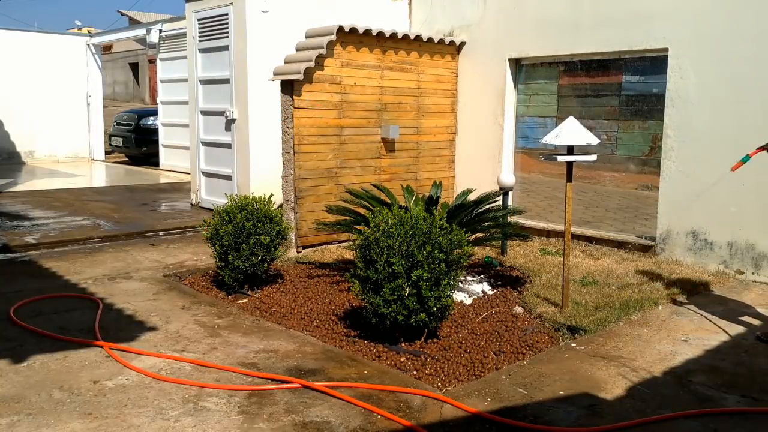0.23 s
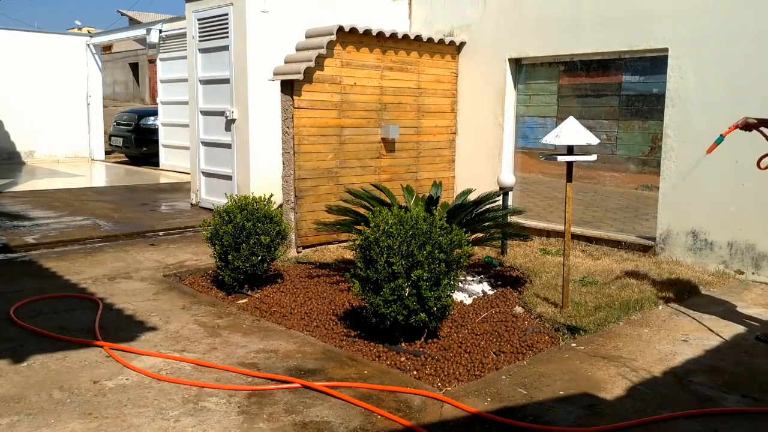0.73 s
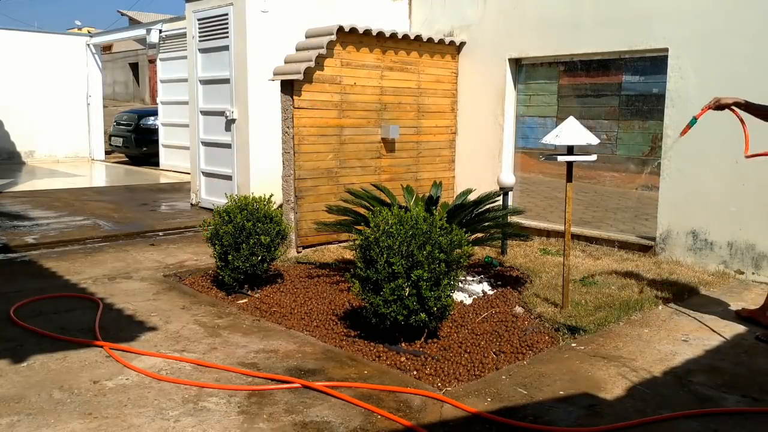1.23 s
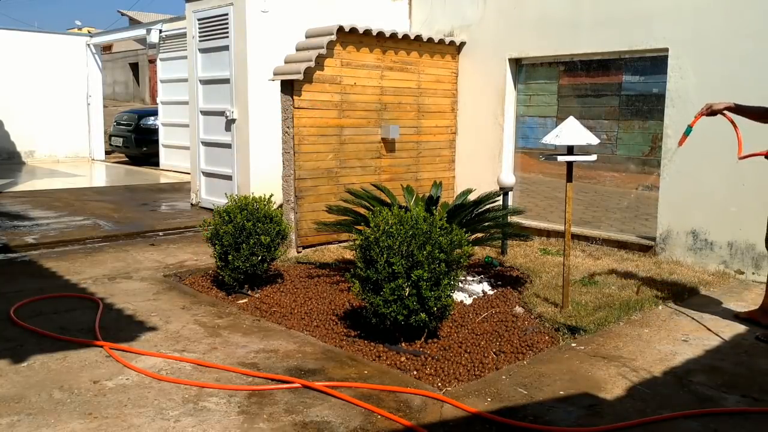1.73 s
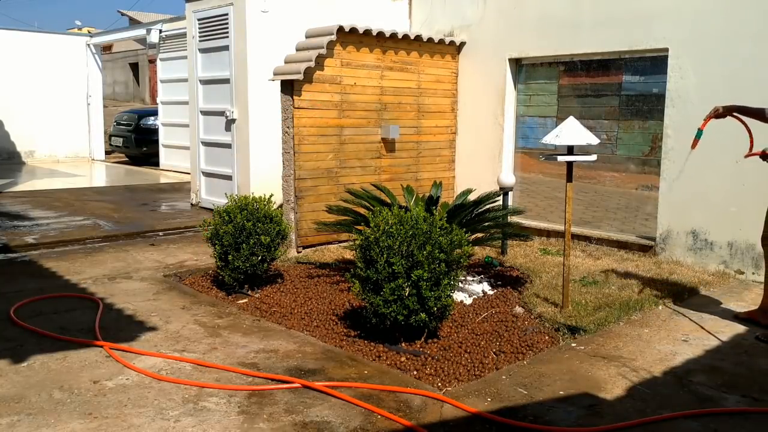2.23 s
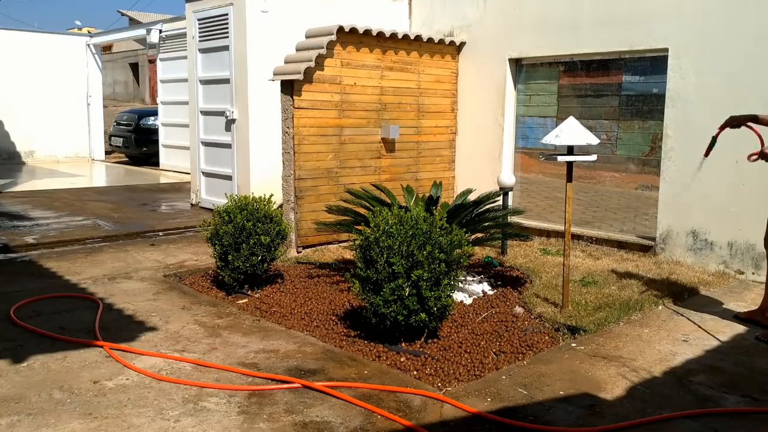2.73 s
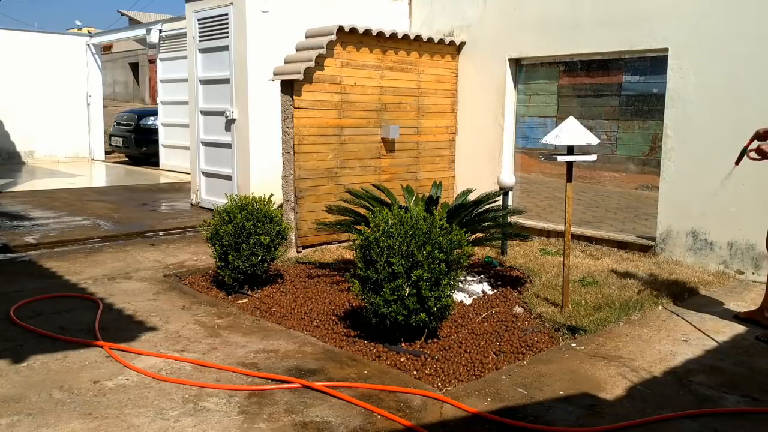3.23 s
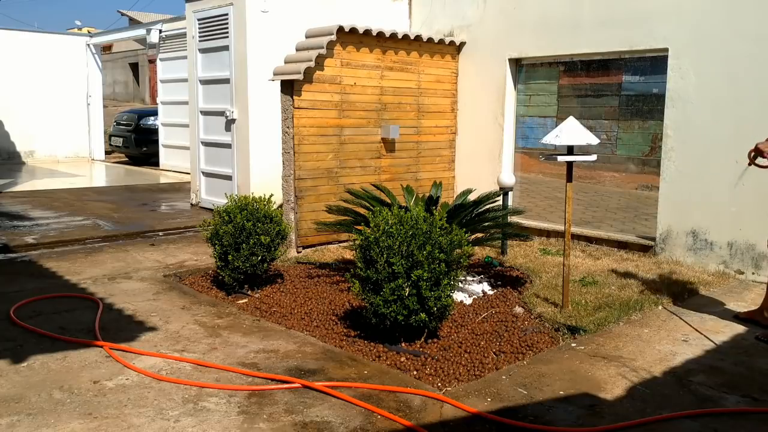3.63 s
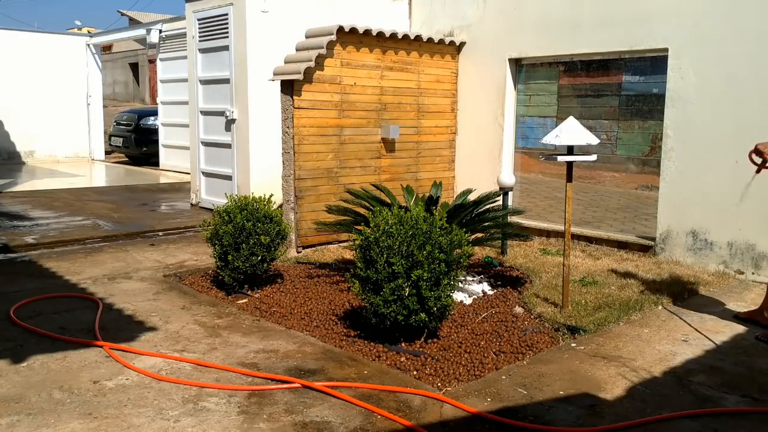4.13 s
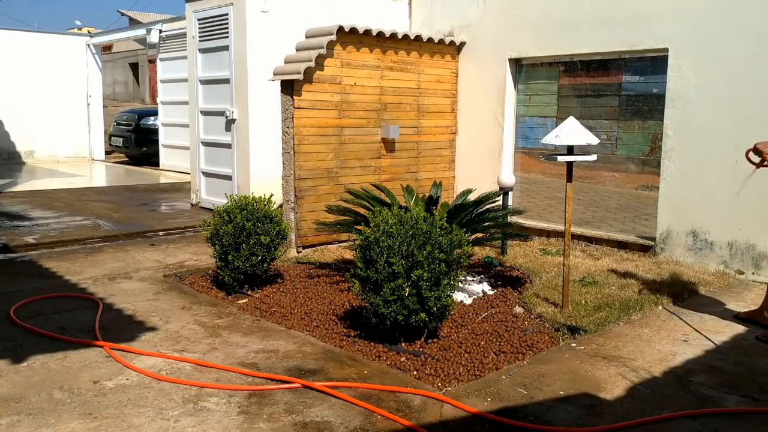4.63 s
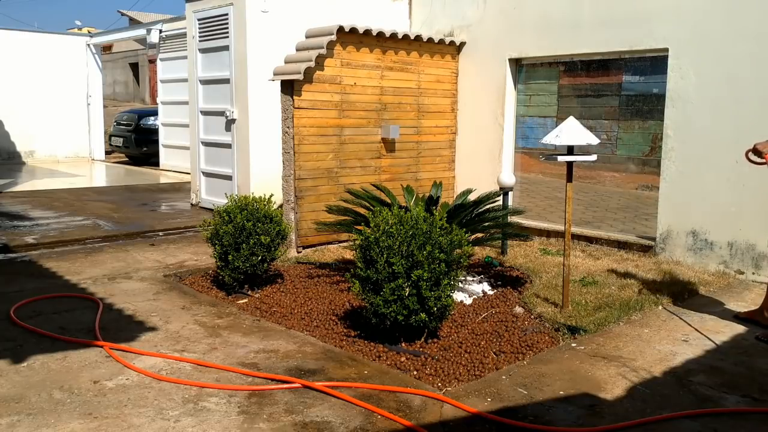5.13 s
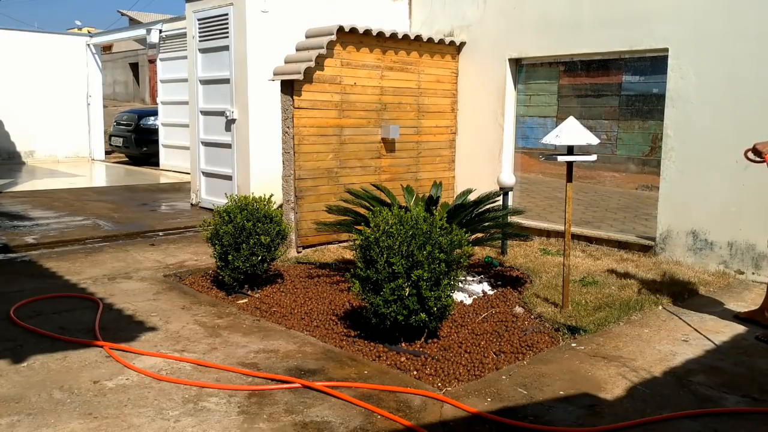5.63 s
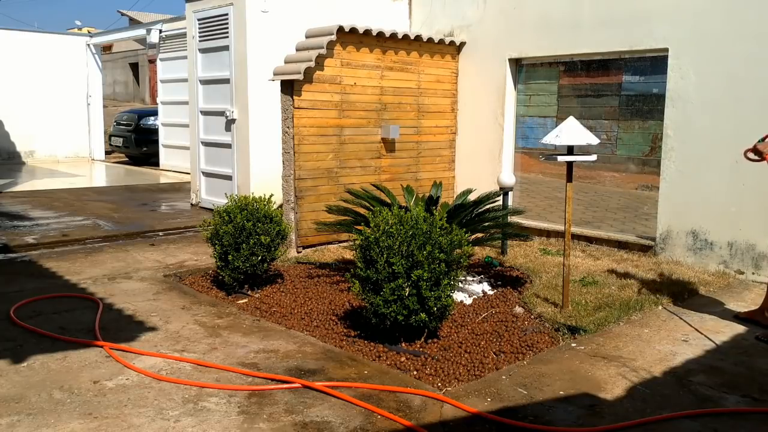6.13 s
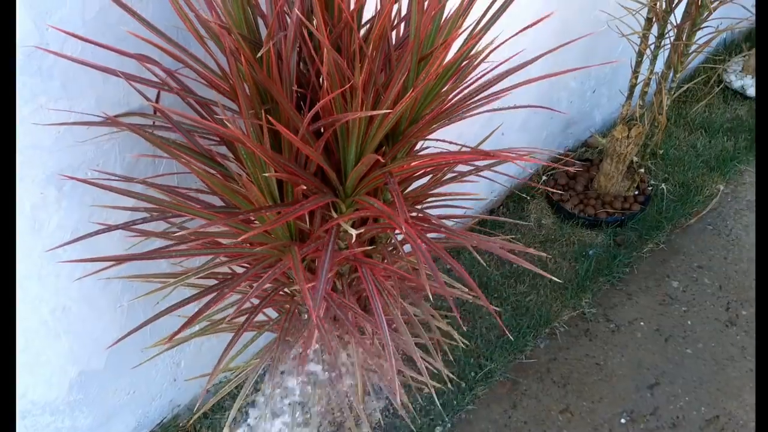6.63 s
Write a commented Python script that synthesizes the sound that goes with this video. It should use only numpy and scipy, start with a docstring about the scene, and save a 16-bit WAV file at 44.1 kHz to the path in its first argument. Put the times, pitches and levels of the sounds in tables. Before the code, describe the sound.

A small bird sings the same quick phrase again and again, a raspy rising and falling whistle followed by short chirps, lightly reflected by the yard walls. Underneath, a garden hose sprays plants and soil with a soft, steady hiss, and something rumbles faintly far away. Near the end the sound drops out for a moment and returns as much louder water hitting leaves close to the microphone.

```python
"""A garden hose sprays a walled yard: drops hiss on shrubs and drum on soil, over a distant low rumble.
A small bird repeats a phrase: a rasp opens a long arched whistle, and one to three short chirps follow.
Faint peeps fall between the phrases, and the walls answer the bird from both sides of the microphone.
After a short silence the spray is right by the microphone, spattering on stiff leaves."""
import sys
import numpy as np
from scipy import signal
from scipy.fft import rfft, irfft, next_fast_len
from scipy.io import wavfile
from scipy.ndimage import map_coordinates

SR = 44100
rng = np.random.default_rng(int(sys.argv[2]) if len(sys.argv) > 2 else 0)


def pcm_store(signal):
    """Save signal as 16-bit PCM."""
    levels = np.round(np.clip(np.atleast_2d(signal), -1, 1) * 32767)
    wavfile.write(sys.argv[1], SR, levels.astype(np.int16).T)


N = 302967
TIME = np.arange(N) / SR


def amp(db):
    """Decibels to gain."""
    return 10 ** (np.asarray(db) / 20)


def unit(x):
    """Scale to rms 1."""
    return x / np.sqrt(np.mean(x ** 2) + 1e-20)


def lean_left(db):
    """Stereo gains: left up by db, right down by db."""
    return amp([[db], [-db]])


def along(points, hz):
    """(frequency, value) points read on a log axis."""
    f, v = np.transpose(points)
    return np.interp(np.log(hz + 1), np.log(f + 1), v)


def wobble(rate):
    """A smooth random curve, rate knots a second."""
    return map_coordinates(rng.standard_normal(int(N * rate / SR) + 4), [TIME * rate])


def swells(rows):
    """Smooth bumps summed from rows of (centre [s], half length [s], height)."""
    return sum(height * np.exp(-np.minimum(((TIME - s) / half) ** 2, 20)) for s, half, height in rows)


def filtered(x, response):
    """x through a complex frequency response."""
    size = next_fast_len(N + SR // 2)
    return irfft(rfft(x, size) * response(np.fft.rfftfreq(size, 1 / SR)), size)[..., :N]


# likeness of the microphone's two sides: (frequency [Hz], correlation [-1..1])
STEREO_LIKENESS = [(60, 0.78), (130, 0.64), (290, 0.29), (630, 0.26), (1380, -0.2), (3020, -0.18),
                   (6600, 0.06), (14400, 0.066)]
def spread(pair, spectrum):
    """Two unrelated signals become a coloured stereo pair of rms 1, alike in the bass."""
    def response(hz):
        angle = np.arccos(np.clip(along(STEREO_LIKENESS, hz), -1, 1)) / 2
        return amp(along(spectrum, hz)) * [np.cos(angle), np.sin(angle)]
    mid, side = filtered(pair, response)
    return unit(np.array([mid + side, mid - side]))


def patter(rate, scatter_db, mist_db):
    """Drop impacts of scattered size, rate a second, over the even rush of fine mist."""
    hits = rng.random((2, N)) < rate / SR
    sizes = amp(scatter_db * np.clip(rng.standard_normal((2, N)), -3, 3)) * rng.choice([-1, 1], (2, N))
    return unit(hits * sizes) + amp(mist_db) * rng.standard_normal((2, N))


# spray on the shrubs: (time [s], relative level [dB])
SHRUB_LEVELS = [(0.0, -49), (0.74, -52), (1.12, -49.5), (2.85, -52), (3.06, -50), (4.49, -53), (6.2, -52)]
# the jet brushes a shrub: (time [s], half length [s], extra level [dB])
SHRUB_BRUSHES = [(0.279, 0.022, 3.5), (2.692, 0.0094, 4), (2.954, 0.004, 6.5)]
# the jet swings onto bare soil: (time [s], half length [s], extra level [dB])
SOIL_SURGES = [(0, 0.091, 4), (.85, 0.055, 4), (1.09, .15, 8), (1.38, 0.11, 8.5)]
# colour of drops on shrubs and on soil: (frequency [Hz], relative level [dB])
SHRUB_SPECTRUM = [(530, -41.5), (900, -5), (1020, -9), (1570, -4.5), (1740, -8), (2050, -6), (5310, -1),
                  (7180, 0), (7790, 0), (10700, -1.5), (14400, -9)]
SOIL_SPECTRUM = [(88, -39), (150, -0.5), (217, -4.5), (369, -7), (648, -8.5), (1280, -14.5), (1630, -15.5),
                 (2000, -14.5), (2600, -17), (4400, -120)]
def hose(shrub_gain_db=5, soil_start_db=-55, fade_db_per_s=0.27):
    """Out in the yard, drops hiss on the shrubs and drum on the soil; the uneven jet moves both."""
    flow = wobble(13)
    shrub_db = np.interp(TIME, *np.transpose(SHRUB_LEVELS)) + swells(SHRUB_BRUSHES) + 0.26 * flow
    soil_db = soil_start_db + swells(SOIL_SURGES) + 0.8 * flow
    soil_db -= fade_db_per_s * TIME  # the hose moves away
    shrubs = spread(patter(rate=2500, scatter_db=4, mist_db=3.5), SHRUB_SPECTRUM)
    soil = spread(patter(rate=420, scatter_db=4, mist_db=2.5), SOIL_SPECTRUM)
    return shrubs * amp(shrub_db + shrub_gain_db) * lean_left(.5) + soil * amp(soil_db) * lean_left(.3)


# colour of the far background: (frequency [Hz], relative level [dB])
RUMBLE_SPECTRUM = [(13, -41.5), (22, -34.5), (46, -1.5), (64, 2.5), (92, -3), (124, -0.5), (150, -11.5),
                   (214, -12), (260, -23.5), (340, -55.5), (570, -120)]
def rumble(noise_db=-50.5, hum_db=-53.5, hum_hz=63.3, sway_db=2.1):
    """A distant low rumble with a wavering hum in it; both sway in level together."""
    noise = spread(rng.standard_normal((2, N)), RUMBLE_SPECTRUM)
    hum = np.sin(2 * np.pi * np.cumsum(hum_hz + 3 * wobble(8.7)) / SR)
    sway = amp(sway_db * wobble(6.3))
    return sway * (amp(noise_db) * noise + amp(hum_db) * hum) * lean_left(1.1)


# faint peeps: (time [s], top pitch [Hz], end pitch [Hz], relative level [dB])
PEEP_NOTES = [(0, 3510, 2370, -38), (.325, 5030, 4750, -47), (.40, 4250, 3900, -42),
              (2.779, 5400, 4850, -49), (2.852, 4240, 4010, -41)]
def peeps(rise_s=.0172, fall_s=.033, harsh_db=-1):
    """Notes between the phrases, each starting just under its top pitch."""
    for start, top_hz, end_hz, db in PEEP_NOTES:
        yield start, rise_s, fall_s, .9 * top_hz, top_hz, end_hz, db, harsh_db


# arched calls: (time [s], rise [s], top pitch [Hz], relative level [dB])
ARCH_NOTES = [(1.053, 0.02, 5415, -24.5), (1.693, 0.05, 5900, -19), (2.39, 0.038, 5394, -17.5),
              (3.027, .046, 5800, -15), (3.566, 0.056, 5850, -18.5), (4.13, .045, 5574, -19.5),
              (4.714, .045, 5356, -21), (5.333, 0.041, 5325, -19.5), (5.998, 0.035, 5410, -20)]
def arches(mid_hz=4820, fall_s=.045, end_hz=3900, harsh_db=1.5):
    """The long note of each phrase climbs from below mid_hz to as far above it, then falls."""
    for start, rise_s, top_hz, db in ARCH_NOTES:
        yield start, rise_s, fall_s, 2 * mid_hz - top_hz, top_hz, end_hz, db, harsh_db


# short chirps: (time [s], top pitch [Hz], relative level [dB], harshness [dB])
CHIRP_NOTES = [(1.127, 4364, -22, -2.5), (1.166, 5340, -22, 0), (1.267, 4430, -17.5, -3),
               (1.78, 5610, -16, -2.5), (1.807, 4340, -21, -2), (1.884, 4840, -20.5, -1),
               (2.431, 5780, -18.5, 3.5), (2.505, 4910, -15, -2.5), (2.533, 4380, -20.5, 3),
               (3.127, 5460, -17, 1), (3.138, 5150, -18.5, -12), (3.229, 4720, -16, -9.5),
               (3.649, 5680, -21, 7), (3.684, 4740, -17.5, -6.5), (3.75, 4855, -22.5, 6),
               (4.249, 4820, -22, 5.5), (4.83, 4640, -23.5, 7), (5.446, 4870, -20.5, 6.5),
               (6.109, 4646, -23, 5.5)]
def chirps(rise_s=.026, fall_s=.028, start_hz=3700, typical_top_hz=4795):
    """The notes after each arch; the higher they reach, the longer they last."""
    for start, top_hz, db, harsh_db in CHIRP_NOTES:
        stretch = (top_hz / typical_top_hz) ** 1.7
        end_hz = min(4264, .92 * top_hz)
        yield start, rise_s * stretch, fall_s * stretch, start_hz, top_hz, end_hz, db, harsh_db


# colour of the bird's breath: (frequency [Hz], relative level [dB])
BREATH_SPECTRUM = [(1600, -18), (2300, -9), (3600, 3), (6000, 9), (8000, -3.5), (10500, -1.5), (13500, -10)]
def breath():
    """Air hisses through the syrinx."""
    return unit(filtered(rng.standard_normal(N), lambda hz: amp(along(BREATH_SPECTRUM, hz))))


# whistle overtones: (multiple of the pitch, relative level [dB])
WHISTLE_OVERTONES = [(2, -23), (3, -21)]
# filter of throat and beak: (frequency [Hz], gain [dB])
BEAK_RESPONSE = [(3000, 0.5), (4700, -3), (5700, 3.5), (6400, 2), (7600, -2), (9400, 5.5), (11000, -7),
                 (11900, -4), (13000, -0.5), (14400, -18)]
def whistles(notes, gain_db=-1.2, breath_db=-21, flutter_db=3, roughness=.024, edge_s=.0024):
    """The syrinx sings each note: the pitch creeps up, leaps and sinks, loudest around the top."""
    song, airflow = np.zeros(N), np.zeros(N)
    shake = 1 + roughness * wobble(1100)  # the shaking syrinx roughens the pitch
    flutter = amp(flutter_db * wobble(250))
    for start, rise_s, fall_s, start_hz, top_hz, end_hz, db, harsh_db in notes:
        peak = start + rise_s
        end = peak + fall_s
        span = slice(int(start * SR), int(end * SR))
        t = TIME[span]
        up, down = np.clip((t - start) / rise_s, 0, 1), np.clip((t - peak) / fall_s, 0, 1)
        leap = .25 * up + .75 * np.sin(np.pi / 2 * up ** 2.2) ** 2
        climb_hz = start_hz + (top_hz - start_hz) * leap
        pitch_hz = climb_hz + (end_hz - top_hz) * down ** 2
        phase = 2 * np.pi * np.cumsum(pitch_hz * shake[span]) / SR
        gate = np.clip(np.minimum(t - start, end - t) / edge_s, 0, 1)
        effort = amp(db + gain_db - 7.5 * down ** 2) * gate
        # the fundamental opens by 12 dB as the pitch leaps, overtones and breath by only 6 dB
        opens_at_hz = min(start_hz + 330, top_hz - 150)
        opening = amp(-12 * np.clip((opens_at_hz - climb_hz) / 300 + .5, 0, 1))
        harshness = amp(harsh_db) * np.sqrt(opening)
        overtones = sum(amp(level) * np.sin(k * phase) for k, level in WHISTLE_OVERTONES)
        song[span] += effort * (opening * np.sin(phase) + harshness * overtones)
        airflow[span] += effort * harshness
    voice = song * flutter + amp(breath_db) * airflow * breath()
    return filtered(voice, lambda hz: amp(along(BEAK_RESPONSE, hz)))


# rasps that open no arch: (time [s], pitch [Hz], relative level [dB])
LONE_RASP_NOTES = [(.025, 4718, -38.5), (5.466, 6700, -29.5)]
def rasps(pitch_ratio=1.18, below_arch_db=13.5, half_length_s=.033, roughness=.09):
    """A hoarse note in a broad hiss opens each arch; its pitch shakes too fast to be heard as a tone."""
    openers = [(s, pitch_ratio * top_hz, db - below_arch_db) for s, _, top_hz, db in ARCH_NOTES]
    rows = sorted(openers + [tuple(row) for row in LONE_RASP_NOTES])
    centres, pitches, _ = np.transpose(rows)
    envelope = swells([(s, half_length_s, amp(db)) for s, _, db in rows])
    pitch_hz = np.interp(TIME, centres, pitches) * (1 + roughness * wobble(2200))
    tone = np.sin(2 * np.pi * np.cumsum(pitch_hz) / SR)
    return envelope * (amp(-5.5) * tone + amp(-6.5) * breath())


# the yard's reverberation: (frequency [Hz], time to fall 60 dB [s])
YARD_DECAY = [(2000, 0.3), (5000, 0.37), (12000, 0.19)]
def yard(x, walls_db=-4, tail_db=-11, echoes=36, reach_s=.03, lead_s=.000265, build_s=.01):
    """The direct sound reaches the microphone's left side first; near walls and a diffuse tail follow."""
    direct = filtered(x, lambda hz: np.exp(1j * np.pi * hz * lead_s * np.array([[1], [-1]])))
    hz, t, noise = signal.stft(rng.standard_normal((2, SR // 2)), SR, nperseg=256)
    decay = amp(-60 * t / along(YARD_DECAY, hz)[:, None])
    tail = signal.istft(noise * decay * (1 - np.exp(-t / build_s)), SR, nperseg=256)[1]
    answer = amp(tail_db) * tail / np.linalg.norm(tail[0])
    # each wall answers from its own side, the later the weaker
    for lateness, side in rng.random((echoes, 2)):
        delay_s = .002 + reach_s * lateness + lead_s * (side - .5) * np.array([-1, 1])
        strength = amp(walls_db) * (1.5 - lateness) / np.sqrt(echoes)
        answer[[0, 1], np.round(delay_s * SR).astype(int)] += strength
    return direct + signal.fftconvolve(x[None], answer, axes=1)[:, :N]


# colour of drops on leaves at close range: (frequency [Hz], relative level [dB])
LEAF_SPECTRUM = [(35, -32.5), (60, 0), (81, -7), (102, -31), (128, -4.5), (222, -6), (279, -8), (682, -12),
                 (1030, -8), (1100, -5.5), (2460, -8), (3170, -13.5), (9530, -0.5), (14400, -10)]
def close_spray(level_db=-27.5, flicker_db=.53):
    """The jet spatters on stiff leaves right by the microphone."""
    drops = spread(patter(rate=3000, scatter_db=-.5, mist_db=-1.5), LEAF_SPECTRUM)
    return drops * amp(level_db + flicker_db * wobble(60)) * lean_left(.7)


def scene(yard_end_s=6.432, close_start_s=6.769):
    """The whole yard, a silent gap, then the spray from close by."""
    garden = hose() + rumble()
    bird = whistles([*peeps(), *arches(), *chirps()]) + rasps()
    garden += yard(bird) * lean_left(.2)
    yard_gate = np.clip((yard_end_s - TIME) / .004, 0, 1)
    close_gate = np.clip((TIME - close_start_s) / .00072, 0, 1)
    return garden * yard_gate + close_spray() * close_gate


def record(dry, limit_hz=14450):
    """The camera's microphone keeps nothing above its band limit."""
    return filtered(dry, lambda hz: np.clip((limit_hz - hz) / 100, 0, 1))


dry = scene()
out = record(dry)
pcm_store(out)
```